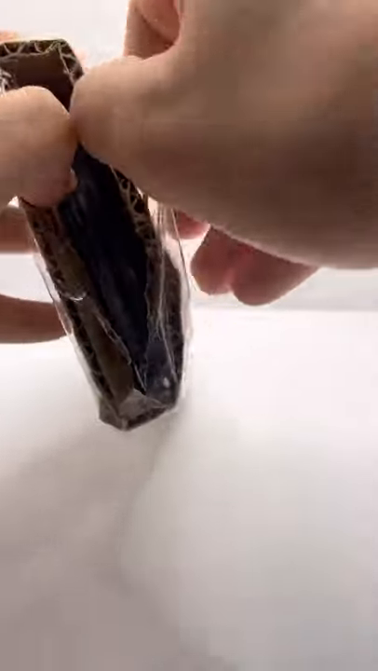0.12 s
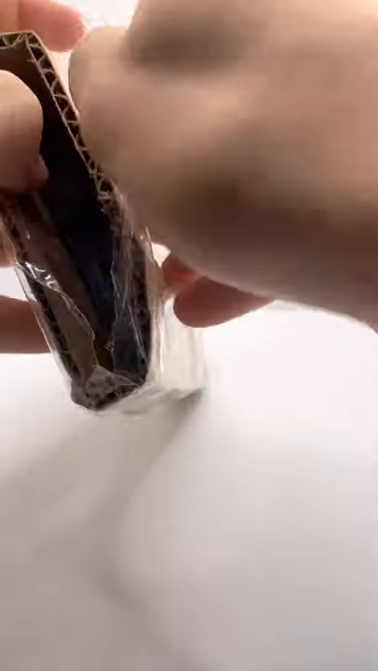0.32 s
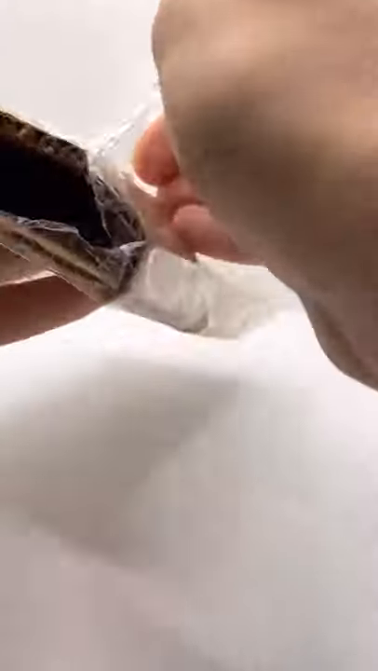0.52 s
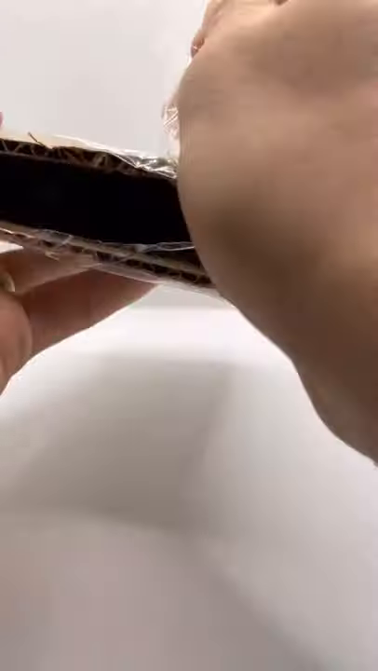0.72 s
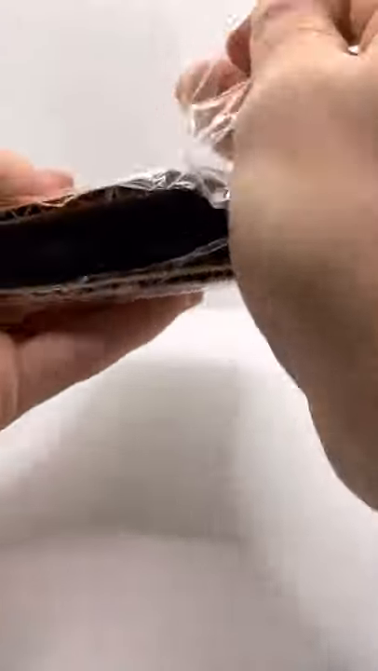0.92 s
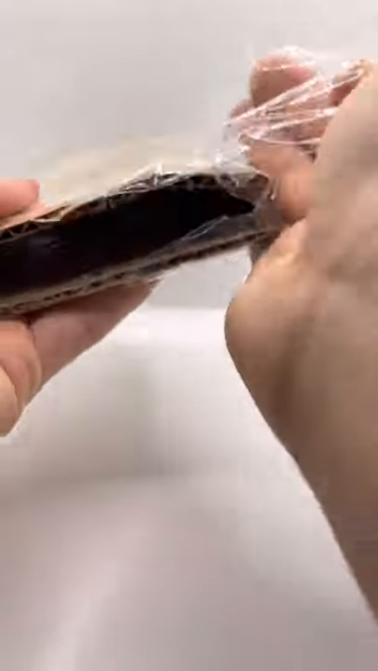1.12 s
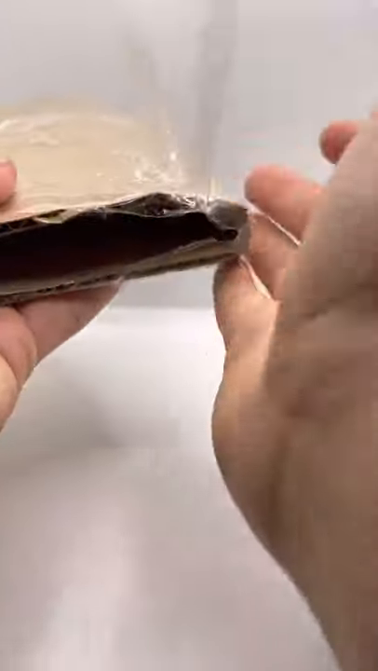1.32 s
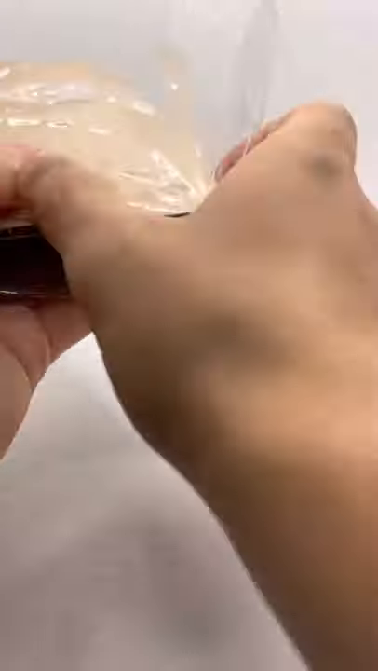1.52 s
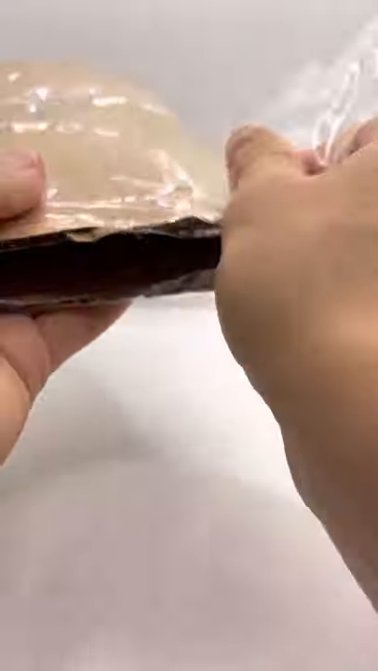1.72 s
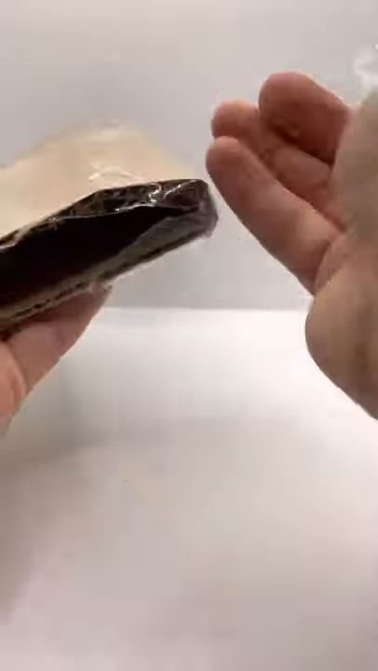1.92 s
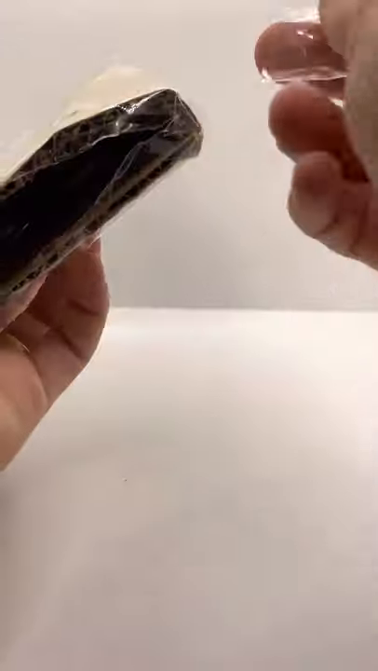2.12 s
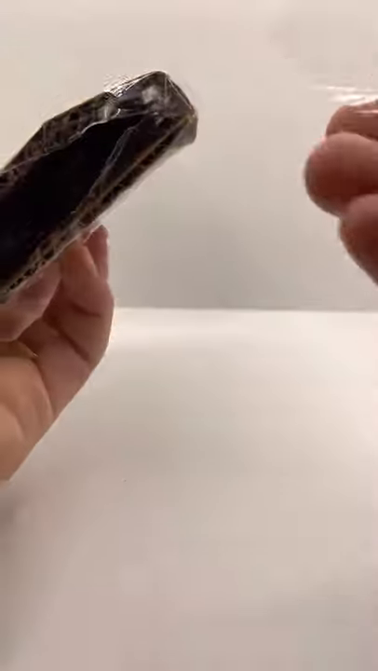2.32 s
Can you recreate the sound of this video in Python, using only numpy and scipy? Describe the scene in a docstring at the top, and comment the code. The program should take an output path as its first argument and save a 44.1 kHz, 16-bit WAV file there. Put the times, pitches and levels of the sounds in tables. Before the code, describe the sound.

Thin plastic film snaps, crackles and rips away from a cardboard packet, close and dry indoors

```python
"""Plastic wrap is peeled and torn from a cardboard mailer by hand, close to a phone in a small room.
Snaps are short clusters of tiny random clicks; tears are longer, fluttering streams of such clicks.
Both are coloured by the film and ring the cardboard. Thuds are fading tones mixed with noise.
A low rumble and a short room echo lie behind. A stereo effect turns the phase of left against right
and adds scattered sound."""
import sys
import numpy as np
from scipy import signal
from scipy.fft import rfft, irfft
from scipy.io import wavfile
from scipy.ndimage import uniform_filter1d

SR = 44100
rng = np.random.default_rng(int(sys.argv[2]) if len(sys.argv) > 2 else 0)


def dump_mix(stems):
    """Bounce the given channels to the path in sys.argv[1] as a 16-bit WAV at rate SR."""
    frames = np.atleast_2d(stems).T  # one column per channel
    limited = np.clip(frames, -1, 1)  # hard clip at full scale
    pcm = np.round(limited * 32767).astype(np.int16)
    wavfile.write(sys.argv[1], SR, pcm)


N = 105840

# strength of the low rumble over time: t/s, level/dB
RUMBLE_LEVEL = [(0, -47.5), (.3, -47), (.5, -57), (0.562, -66.5), (0.719, -52), (1.079, -63.5),
                (1.4, -54.5), (1.8, -60), (2.4, -57)]
# tone colour of the rumble of room and hands: f/Hz, relative level/dB
RUMBLE_COLOUR = [(30, -24), (60, -6), (110, -13.5), (140, 6), (175, -11), (230, -5), (350, -14),
                 (1200, -38.5), (6000, -75)]
# how long the room echo takes to fall by 60 dB: f/Hz, t60/s
ROOM = [(300, 0.16), (12000, 0.088)]
# the mailer jolted in the hand, low thuds to short knocks: t/s, tone level/dB, f/Hz, t60/s
THUDS = [(0.299, -15.5, 1375, 0.016), (0.3225, -16.5, 574, 0.016), (.7705, -14.5, 1485, 0.054),
         (.772, -27, 205, 0.062), (0.916, -19.5, 172, 0.042), (.915, -25.5, 1730, 0.021),
         (0.991, -14.5, 2074, 0.017), (1.369, -35, 271.5, 0.068), (1.383, -45, 63, 0.28),
         (1.623, -37, 66.6, 0.06)]
# faint rustle of the loose film: t/s, level/dB
RUSTLE = [(0, -56), (.52, -58.5), (.66, -75), (.76, -60), (1.3, -58.5), (1.34, -71), (1.51, -81.5),
          (1.56, -65.5), (2.1, -72), (2.25, -73.5), (2.4, -69)]
# long tears: start t/s, end t/s, film start level/dB, film end level/dB, cardboard over film/dB
TEARS = [(0.05, 0.09, -43.5, -43.5, 4), (0.189, 0.203, -32, -34.5, -14), (0.254, 0.415, -40, -42.5, -10),
         (0.404, 0.494, -19.5, -27, -8.5), (0.925, 0.997, -23.5, -18.5, -9),
         (1.001, 1.051, -25.5, -31.5, -15), (1.251, 1.282, -44.5, -38.5, -5.5),
         (1.627, 1.715, -36.5, -42, -10), (1.721, 1.745, -15.5, -31, -9.5),
         (1.748, 1.782, -24.5, -15.5, -11), (1.783, 1.841, -22, -50.5, -9),
         (1.948, 1.962, -50.5, -50.5, 0.5)]
# snaps of the film: t/s, strength/dB (before SNAP_DB), cardboard over film/dB (before BOARD_DB)
SNAPS = [(0.057, -22.5, -17), (0.1528, -29.5, -27.5), (0.2465, -8.5, -19), (0.2742, -5, -20),
         (0.304, -8.5, -20.5), (0.3205, -4.5, -13), (0.3598, -8.5, -46.5), (0.3768, -20, -46.5),
         (0.3879, -7, -43.5), (0.4068, -7.5, -22), (0.4298, -13, -5), (0.585, -33.5, -3.5),
         (0.77, -4.5, -19), (0.7808, -10.5, -8), (0.8848, -12.5, -13.5), (0.9135, -2, -13),
         (0.947, -9.5, -8.5), (1.0451, -13.5, -11), (1.0617, -15, -21.5), (1.0825, -16.5, -28),
         (1.1075, -13.5, -20), (1.1531, -12.5, -15.5), (1.1735, -16.5, -11), (1.2246, -19, -16),
         (1.256, -12.5, -24.5), (1.289, -22, -39), (1.368, -43, 10.5), (1.4732, -41, 4.5),
         (1.6204, -16, -22), (1.688, -15.5, -41), (1.7149, -4, -20.5), (1.7722, -5.5, -61.5),
         (1.859, -29, -36.5), (1.8725, -32, -9), (1.9047, -18, -26.5), (2.0029, -34, -6),
         (2.0374, -33, -45), (2.0589, -27, -53), (2.121, -26.5, -14.5), (2.1782, -46.5, 11),
         (2.2132, -43, -1.5), (2.2634, -40, 1.5), (2.286, -31.5, -11.5), (2.3059, -32.5, -17),
         (2.3211, -25.5, -37), (2.3543, -33.5, -2), (2.366, -35, -6)]
# tone colour of the film: f/Hz, relative level/dB
FILM = [(300, -31.5), (3000, -9), (4500, -3), (6500, -0.5), (9300, 0), (11000, 5.5), (12300, -4.5),
        (13200, -13.5), (14200, -45), (16000, -50.5)]
# cardboard resonances: f/Hz, width/Hz, relative level/dB
BOARD = [(572, 190, 1.5), (733, 170, 0), (1396, 130, 1), (1817, 92, 1.5), (2500, 1900, 1.5)]
# how far the left channel is ahead of the right in phase: f/Hz, lead/radians
STEREO_PHASE = [(800, .1), (1100, -1),  (2200, .1), (2900, 1.4), (4100, .6), (4900, 3.2), (5600, 6.1),
                (8200, 9), (9600, 9.6), (12100, 12.4)]

HUM_PATCH_DB = 2.0  # unevenness of the rumble
ROOM_DB, ROOM_START_S = -13.5, 0.004  # echo against direct sound; its delay
THUD_RISE_CYCLES, THUD_NOISE = 0.64, 0.8  # length of the rise; noise beside a tone of 1
THUD_SAG = 0.12  # share of its cycles that the tone has fallen behind by t60
CRACKS_PER_S = 14000
CRACK_SPREAD_DB, RIP_SPREAD_DB = 2.5, 2.5  # unevenness of the clicks in snaps and in tears
FLUTTER_DB, TINT_DB = 2, 3.5  # how far the level and the colour of the tears wander
RUSTLE_BOARD_DB = -6  # cardboard against film in the rustle
RISE_S = 0.00097  # a snap rises in this time, a tear in twice this time
TEAR_EDGE_S = 0.009  # fade at the end of a tear
SNAP_S, FALL_SHAPE = 0.0099, 1.3  # fall time of a snap of strength 0 dB; bend of the fall
LONGER_DB_PER_DB = 0.58  # strong snaps last longer
SETTLE_DB, SETTLE_T60_S = -13.5, 0.08  # the film rustles on after each snap
SNAP_DB, BOARD_DB = -7, 1.5  # added to every snap; added to its cardboard part
SNAP_TINT_DB = 3.5  # how much the film colour differs from snap to snap
DULL_DB_PER_DB = 0.0144  # dB per kHz that a snap loses for each dB it is weaker
SCATTER_DB, SCATTER_T60_S = -11, 0.07  # scattered sound, opposite left and right; level before filtering
SCATTER_HZ, SCATTER_TOP_HZ = 500, 8000  # it is weaker below and above these
EDGE_HZ = 16400  # top of the sound


def amp(db):
    """Turn decibels into a plain factor."""
    return 10 ** (np.asarray(db) / 20)


def evened(x):
    """Scale to an average (RMS) level of 1."""
    return x / np.sqrt(np.mean(x ** 2) + 1e-20)


def read(points, hz):
    """Read a table between its points, on a logarithmic pitch scale."""
    f, value = np.transpose(points)
    return np.interp(np.log(hz + 1), np.log(f + 1), value)


def level_over_time(points):
    """Turn a table of times and decibels into a factor for every sample."""
    return amp(np.interp(np.arange(N) / SR, *np.transpose(points)))


def add(mix, s, sound):
    """Mix a sound in at s seconds, cutting off what runs past the end."""
    part = mix[round(s * SR):][:len(sound)]
    part += sound[:len(part)]


def smooth_twice(x, first, second):
    """Average neighbours twice; each step is given as (size, axis)."""
    return uniform_filter1d(uniform_filter1d(x, *first), *second)


def causal(db, size=1024):
    """Filter of energy 1 with the given dB per frequency and no ringing ahead (minimum phase)."""
    log = np.log(amp(np.maximum(db, -100)))
    full = np.r_[log, log[-2:0:-1]]
    h = np.fft.ifft(np.exp(np.conj(signal.hilbert(full)))).real[:size]
    return h / np.linalg.norm(h)


def hum():
    """Low, lumpy rumble: random noise with a set colour and soft random patches."""
    frames, hz = N // 512 + 5, np.fft.rfftfreq(2048, 1 / SR)
    real, imaginary, patches = rng.standard_normal((frames, 1025, 3)).T
    patches = evened(smooth_twice(patches, (4, 0), (5, 1)))
    colour = amp(read(RUMBLE_COLOUR, hz)[:, None] + HUM_PATCH_DB * patches)
    noise = signal.istft((real + 1j * imaginary) * colour, nperseg=2048, noverlap=1536)[1][:N]
    return level_over_time(RUMBLE_LEVEL) * evened(noise)


def tail(start_s):
    """Room echo: sparse taps of random sign, each pitch dying at its own speed; energy 1."""
    taps = np.zeros(SR // 2)
    at = np.arange(round(start_s * SR), len(taps) - 20, 20)
    taps[at + rng.integers(0, 20, len(at))] = rng.choice([-1., 1.], len(at))
    hz, t, z = signal.stft(taps, SR, nperseg=128)
    fade = amp(-60 * t / read(ROOM, hz)[:, None])
    h = signal.istft(z * fade, SR, nperseg=128)[1]
    return h / np.linalg.norm(h)


def thuds():
    """Damped pushes on the mailer, each a fading tone with noise around its pitch."""
    out, t = np.zeros(N), np.arange(round(.3 * SR)) / SR
    for s, db, hz, t60 in THUDS:
        band = signal.butter(2, [hz / 2, hz * 1.59], "band", fs=SR)
        noise = evened(signal.lfilter(*band, rng.standard_normal(len(t))))
        tone = np.sin(2 * np.pi * hz * t * (1 - THUD_SAG * np.minimum(t / t60, 1)))
        shape = amp(db - 60 * t / t60) * np.minimum(t * hz / THUD_RISE_CYCLES, 1)
        add(out, s, shape * (tone + THUD_NOISE * noise))
    return out


def cracks(spread_db):
    """Dense random clicks, a few much larger than the rest."""
    size = amp(spread_db * np.minimum(rng.exponential(1, N), 6)) * rng.choice([-1, 1], N)
    return evened(size * (rng.random(N) < CRACKS_PER_S / SR))


def colours():
    """Frequencies, film colour in dB, and the cardboard as a filter of summed resonances."""
    hz = np.fft.rfftfreq(4096, 1 / SR)
    board = sum(amp(db) ** 2 / (1 + (2 * (hz - f) / w) ** 2) for f, w, db in BOARD)
    board = board * hz ** 2 / (hz ** 2 + 250 ** 2) / (1 + (hz / 3000) ** 4)  # less bass and treble
    return hz, read(FILM, hz), causal(10 * np.log10(board + 1e-12))


def shimmer(x):
    """Random patches of colour, a few milliseconds long, so the tears shimmer unevenly."""
    z = signal.stft(x, nperseg=128)[2]
    patches = smooth_twice(rng.standard_normal(z.shape[::-1]).T, (5, 0), (4, 1))
    return signal.istft(z * amp(TINT_DB * evened(patches)), nperseg=128)[1][:N]


def rip():
    """Fluttering streams of cracks through film and cardboard: long tears over the faint rustle."""
    hz, film_db, board = colours()
    t = np.arange(N) / SR
    film = level_over_time(RUSTLE)
    card = film * amp(RUSTLE_BOARD_DB)
    for start, end, start_db, end_db, share_db in TEARS:
        rise, fade = (t - start) / (2 * RISE_S), (end - t) / TEAR_EDGE_S + .5
        on = np.clip(np.minimum(rise, fade), 0, 1)
        level = on * amp(np.interp(t, [start, end], [start_db, end_db]))
        # levels add up by energy
        film, card = np.hypot(film, level), np.hypot(card, level * amp(share_db))
    out = np.zeros(N)
    for level, colour in ((film, causal(film_db)), (card, board)):
        flutter = evened(smooth_twice(rng.standard_normal(N), (150,), (150,)))
        stream = level * amp(FLUTTER_DB * flutter) * cracks(RIP_SPREAD_DB)
        out += signal.oaconvolve(stream, colour)[:N]
    return shimmer(out)


def snaps():
    """Each snap is a quick cluster of cracks with its own tint that also shakes the cardboard."""
    hz, film_db, board = colours()
    film_cracks, board_cracks = cracks(CRACK_SPREAD_DB), cracks(CRACK_SPREAD_DB)
    out, t = np.zeros(N), np.arange(round(.08 * SR)) / SR
    tints = rng.standard_normal((len(SNAPS), 8))
    tint_hz = np.linspace(1000, 14000, num=8)
    for (s, db, share_db), tint in zip(SNAPS, tints):
        at = round(s * SR)
        here = slice(at, at + len(t))
        fall = np.exp(-(t / (SNAP_S * amp(LONGER_DB_PER_DB * db))) ** FALL_SHAPE)
        settle = amp(SETTLE_DB - 60 * t / SETTLE_T60_S)
        shape = amp(db + SNAP_DB) * np.minimum(t / RISE_S, 1) * (fall + settle)
        shape = shape[:N - at]
        tint_db = SNAP_TINT_DB * np.interp(hz, tint_hz, tint)
        film = causal(film_db + tint_db + DULL_DB_PER_DB * db * hz / 1000)
        add(out, s, signal.oaconvolve(shape * film_cracks[here], film))
        shaken = signal.oaconvolve(shape * board_cracks[here], board)
        add(out, s, amp(share_db + BOARD_DB) * shaken)
    return out


def widen(x):
    """Stereo effect: turn left against right in phase; add scattered sound left, subtract it right."""
    hz, X = np.fft.rfftfreq(2 * N, 1 / SR), rfft(x, 2 * N)
    turn, t = np.exp(.5j * read(STEREO_PHASE, hz)), np.arange(3000) / SR  # half the lead on each side
    scatter = rng.standard_normal(len(t)) * amp(-60 * t / SCATTER_T60_S)
    apart = rfft(scatter / np.linalg.norm(scatter), 2 * N) * amp(SCATTER_DB)
    apart = apart * hz ** 3 / (hz ** 3 + SCATTER_HZ ** 3)
    apart = apart / np.sqrt(1 + (hz / SCATTER_TOP_HZ) ** 4)
    left, right = X * (1 + apart) * turn, X * (1 - apart) / turn
    return np.array([irfft(left)[:N], irfft(right)[:N]])


def scene():
    """Mix the wrap, its room echo and the rumble, then widen them to stereo."""
    wrap = snaps() + rip() + thuds()
    echo = amp(ROOM_DB) * signal.fftconvolve(wrap, tail(ROOM_START_S))[:N]
    return widen(wrap + echo + hum())


def record(dry):
    """The microphone drops the deep bass and rounds the highest peaks; then the band limit."""
    thin = signal.lfilter(*signal.butter(2, 45, "high", fs=SR), dry)
    band_limit = signal.firwin(511, EDGE_HZ, window=("kaiser", 9), fs=SR)
    return signal.oaconvolve(np.tanh(thin), band_limit[None], "same")


dry = scene()
out = record(dry)
dump_mix(out)
```